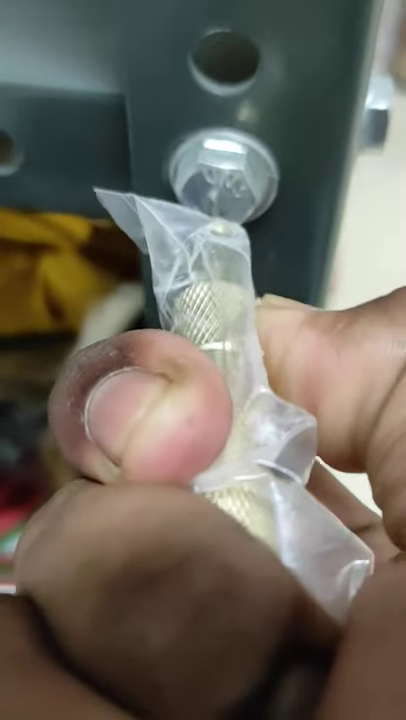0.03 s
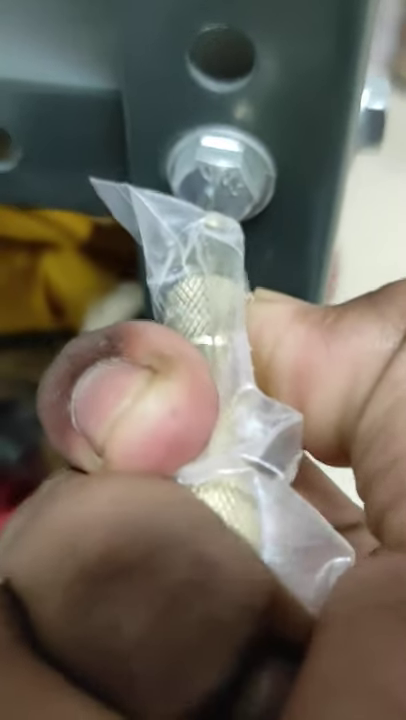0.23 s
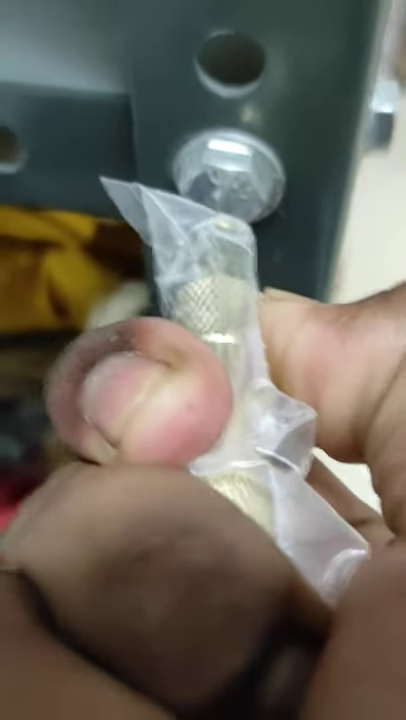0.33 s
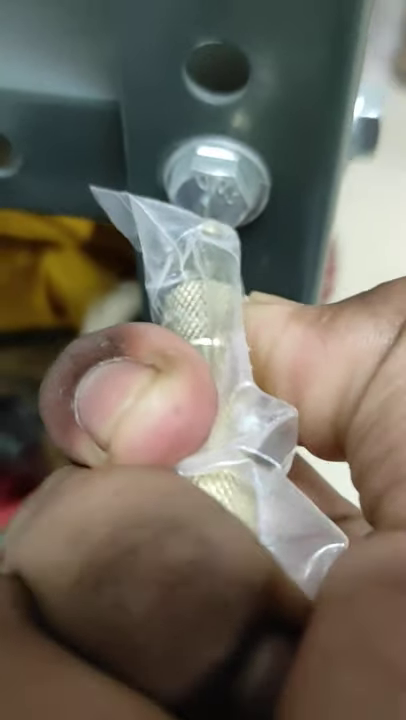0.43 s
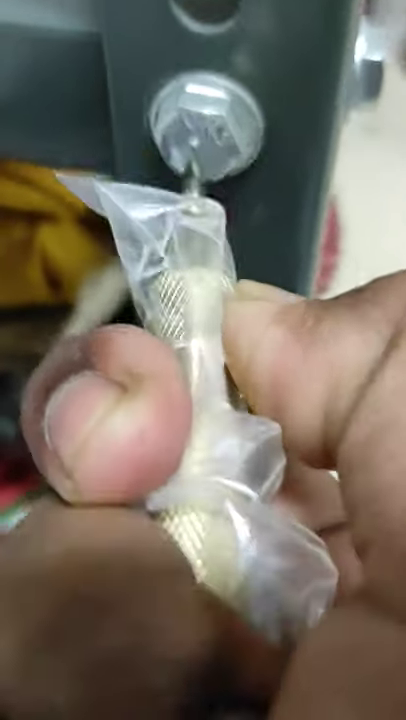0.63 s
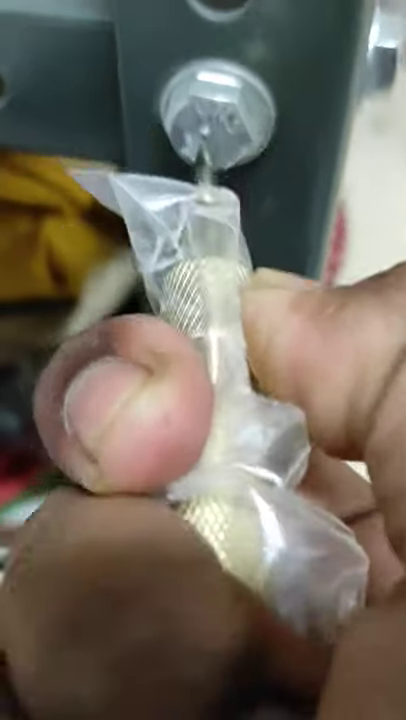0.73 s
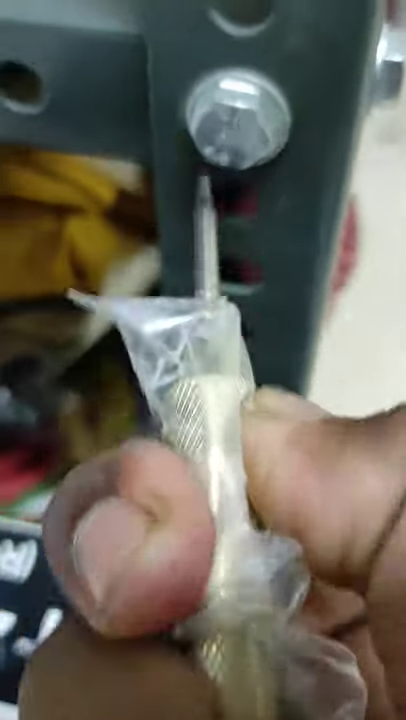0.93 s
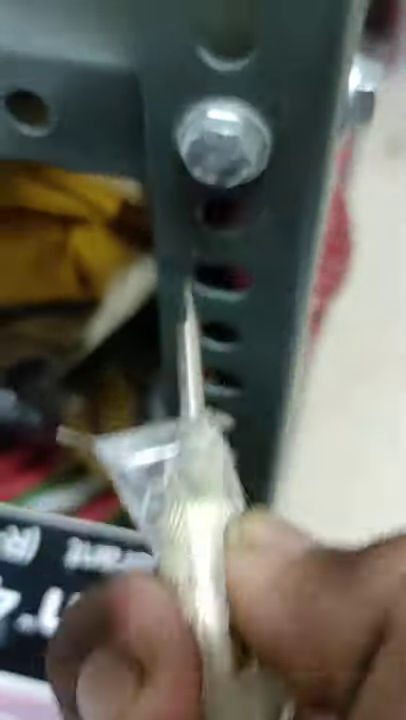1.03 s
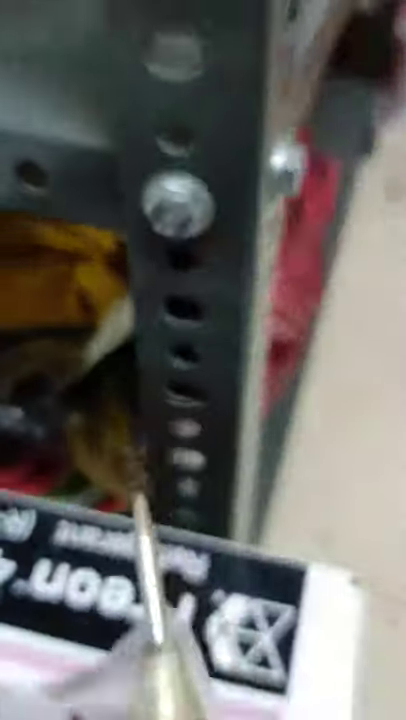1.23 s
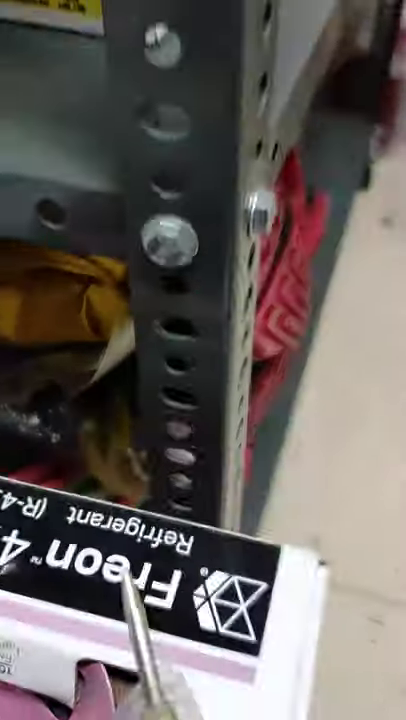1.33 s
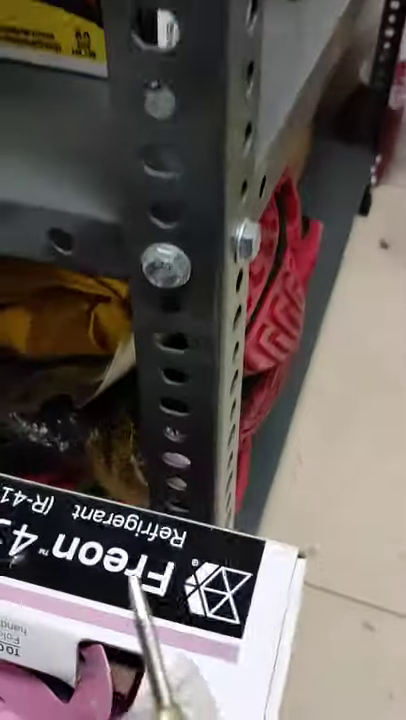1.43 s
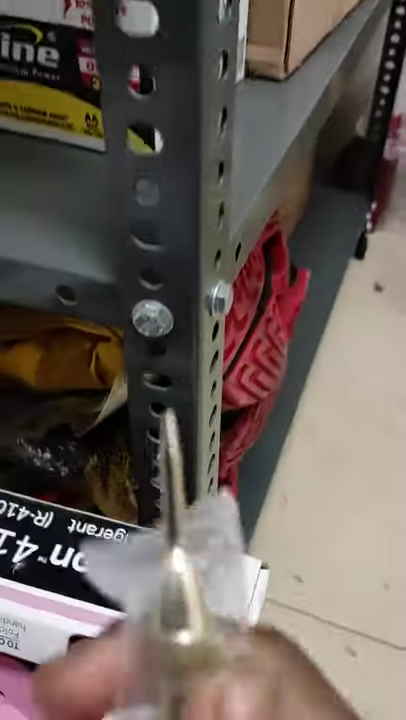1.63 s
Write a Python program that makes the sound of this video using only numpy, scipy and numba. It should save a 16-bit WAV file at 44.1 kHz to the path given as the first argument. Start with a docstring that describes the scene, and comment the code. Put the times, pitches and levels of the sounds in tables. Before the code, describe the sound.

A spring-loaded punch snaps against a steel shelf bolt, ringing briefly, then clicks softly.

```python
"""Centre punch on a steel shelf

A spring-loaded centre punch fires against a bolt in a steel shelf, whose many modes ring densely.
The blow overloads two close microphones, and their gain control dips and recovers. Eased off, the
punch scrapes and resets with clicks; the plastic bag round it rustles and cracks. A quiet room hums."""
import sys
import numpy as np
from scipy import signal
from scipy.fft import rfft, irfft
from scipy.io import wavfile
from scipy.ndimage import uniform_filter1d
from numba import njit

SR = 44100
rng = np.random.default_rng(int(sys.argv[2]) if len(sys.argv) > 2 else 0)


def bounce(signal):
    """Save signal as a 16-bit WAV file at the path given by the first command-line argument."""
    frames = np.transpose(np.atleast_2d(signal))
    limited = np.clip(frames, -1, 1)
    pcm = np.round(limited * 32767).astype(np.int16)
    wavfile.write(sys.argv[1], SR, pcm)


N = 74970
TIME_S = np.arange(N) / SR
SNAP_S, LEFT_DELAY_S = 0.2047, 0.0013

# Clicks of the resetting punch: start_s, drive_db, centre_hz, t60_s, pan_db, shelf_db, body_db
RESET_CLICKS = [(0.6902, -17, 7000, .012, -15, -45, -26), (.6912, -9, 2500, 0.026, -2, -62, -20.5),
                (.6925, -8.5, 8200, 0.026, 8.5, -29.5, -15.5), (.6952, -15.5, 7200, 0.032, -6, -58, -19),
                (0.9171, -23, 6100, 0.016, -4, -46.5, -44), (0.9177, -24.5, 2980, 0.016, -1, -65, -44),
                (0.9229, -27, 5600, .015, 0, -49, -46)]


def shelf_ring():
    """Linear superposition: the blow and each light knock of the reset excite the same steel modes."""
    blow, knocks = np.zeros((2, 2, N))
    blow[0, int((SNAP_S + LEFT_DELAY_S) * SR)] = blow[1, int(SNAP_S * SR)] = undb(-5.5)
    for start_s, *_, shelf_db, _ in RESET_CLICKS:
        knocks[:, int(start_s * SR)] = undb(shelf_db)
    # Light knocks hardly reach the highest modes.
    knocks = signal.sosfilt(signal.butter(4, 10200, fs=SR, output="sos"), knocks)
    return convolve(blow + knocks, steel_response())


def steel_response(size=32768, clatter_t60_s=0.19, rise_s=0.0054, scatter_db=6):
    """Modal overlap: crowded modes of struck steel merge into decaying noise, and a few stand clear."""
    # Resolved modes of shelf and punch: pitch_hz, relative_db, t60_s
    clear_modes = [(200.4, -22, 0.64), (411, -22.5, .5), (579, -8.5, .1), (863, -11, 0.17),
                   (1047.5, -12.5, 0.46), (1470, -19.5, 0.28), (1630, -20, .3), (1963, -11, 0.21),
                   (2200, -11, 0.24), (2430, -22.5, .6), (2616, -18, 0.17), (2880, -14, .2),
                   (3320, -25.5, 0.58), (3556, -25, .45), (3790, -27, 0.46), (4240, -15, 0.45),
                   (4750, -24, 0.73), (5270, -32, 0.62), (5980, -9, 0.18), (6550, -20.5, 0.6),
                   (7000, -25, .7), (6990, -25, .7), (7200, -24, 0.58), (7260, -17, 0.41), (7560, -24, .6),
                   (7700, -23, 0.65), (10000, -22, .45), (10600, -12, 0.45), (10940, -12, .35),
                   (11800, -15, .33), (12100, -8, 0.49), (12570, -9, 0.39), (12760, -12, 0.42),
                   (13610, -17, 0.45), (13850, -17, 0.41), (14110, -16, 0.38), (14980, -18, .25),
                   (15070, -20, .25)]
    # Overlapping modes of the shelf: centre_hz, clatter_db, ring_db, ring_t60_s
    dense_modes = [(60.4, -30, -41, 0.22), (151, -20.5, -54, 0.34), (220, -18.5, -50, 0.9),
                   (425, -15.5, -37, 1), (630, -11, -38, 0.53), (912, -8.5, -19, 0.72),
                   (2080, -11.5, -12, 0.54), (2770, -4.5, -21, 0.83), (3700, -18, -21, 0.65),
                   (4800, -25, -15.5, 0.81), (5930, -25, -14, 0.76), (7430, -13, -6.5, 0.63),
                   (9350, 5, -10.5, 0.48), (12100, -38, -12, 0.72), (16700, -7, -11, 0.2)]
    t = np.arange(size) / SR
    out = modes(clear_modes, size) * undb(1)
    strength = undb(scatter_db * rng.standard_normal(size // 2 + 1))
    spectrum = rfft(rng.standard_normal((2, size))) * strength
    for hz, noise in half_octaves(spectrum, size):
        clatter_db, ring_db, ring_t60_s = columns_at(dense_modes, hz)
        clatter = undb(clatter_db - 60 * t / clatter_t60_s)
        ring = undb(ring_db - 60 * t / ring_t60_s)
        out += unit(noise) * np.hypot(clatter, ring)
    return out * (1 - np.exp(-t / rise_s))


def punch_snap():
    """Path difference: the crack of the firing punch reaches the left microphone later."""
    crack = click(SNAP_S, drive_db=-8.5, centre_hz=5500, t60_s=0.02, pan_db=0)
    crack[0] = np.roll(crack[0], int(LEFT_DELAY_S * SR))
    return crack


def punch_scrape(start_s=0.645, squeak_s=0.672, end_s=0.69, fade_s=0.011):
    """Sliding friction: broadband grit, joined by a narrow squeak just before the reset."""
    def fade_in(onset_s):
        return np.clip((TIME_S - onset_s) / fade_s, 0, 1)

    friction = rng.standard_normal((2, N))
    grit = unit(band(band(friction, 6100, 10100), 6100, 10100)) * undb(-37) * fade_in(start_s)
    squeak = unit(band(friction, hz=7010, width_hz=256.6)) * undb(-41) * fade_in(squeak_s)
    return (grit + squeak) * (TIME_S < end_s) * pan(-6)[:, None]


def body_knocks():
    """Impulse response: each reset click sets the hollow tool body ringing."""
    # Modes of the tool body: pitch_hz, relative_db, t60_s
    body_modes = [(637, -26, 0.052), (720, -20, 0.12), (875, -21, 0.13), (957, -16, 0.12),
                  (1120, -20, 0.17), (2195, -21, 0.038), (3150, -19.5, 0.21), (5050, -22, 0.9),
                  (5728, -29, .4), (6869, -22, .1), (7900, -27, .27), (8660, -31, .3), (9200, -12.5, 0.077)]
    taps = np.zeros((2, N))
    for start_s, *_, body_db in RESET_CLICKS:
        taps[:, int(start_s * SR)] = undb(body_db)
    return convolve(taps, modes(body_modes, SR // 2))


def plastic_bag():
    """Amplitude modulation: noise flickers into a crackle that follows the hand, with louder cracks."""
    # Envelope of the rustle: time_s, level_db, pan_db
    rustle_path = [(.6, -77, 4), (0.759, -76, 5), (.86, -54.5, -4), (.92, -42, -7), (.98, -51, -1),
                   (1.02, -74, 10), (1.2, -65, 4), (1.36, -63, 7), (1.45, -60, 5.5), (1.55, -56, 6),
                   (1.62, -48.5, 6), (1.7, -58, 3)]
    # Single cracks of the plastic: start_s, drive_db, centre_hz, t60_s, pan_db
    cracks = [(1.441, -44, 10100, 0.04, 15), (1.457, -26, 1400, 0.011, 6), (1.483, -40, 8500, .03, 4),
              (1.4856, -32, 8700, 0.012, 12), (1.497, -46, 12000, 0.024, 16), (1.5, -32, 13000, 0.014, 16),
              (1.502, -32, 9500, 0.013, 14), (1.5287, -16, 7600, 0.02, 4), (1.5288, -18.5, 3560, 0.015, 7),
              (1.576, -26.5, 8300, 0.013, 8), (1.577, -27.5, 5070, 0.014, 1),
              (1.606, -34, 2500, 0.016, -11), (1.6819, -18.5, 1400, 0.0096, 10),
              (1.6817, -22.5, 3140, 0.0076, 5), (1.6822, -31.5, 8000, .008, 7)]
    time_s, level_db, pan_db = np.array(rustle_path).T
    grains = rng.standard_normal((2, N)) * undb(3.5 * flutter(340) + 2 * flutter(38.54))
    rustle = unit(band(grains, hz=7000, width_hz=10100)) * undb(np.interp(TIME_S, time_s, level_db))
    return rustle * pan(np.interp(TIME_S, time_s, pan_db)) + sum(click(*row) for row in cracks)


def faint_ring(start_s=0.8, pitch_hz=797.5, growth_s=0.3):
    """Damping overtakes growth: a soft tone swells and dies as the tool is drawn back."""
    t = np.maximum(TIME_S - start_s, 0)
    swell = 1 - np.exp(t / growth_s)
    decay = undb(-43.5 - 120 * t)
    return swell * decay * np.sin(2 * np.pi * pitch_hz * t)


def room_reverb(sound, level_db=-13, t60_s=0.17, cutoff_hz=6500):
    """Diffuse reflection: a dull tail of noise sets in after 3 ms and decays exponentially."""
    t = np.arange(SR // 2) / SR
    tail = rng.standard_normal((2, len(t))) * undb(-60 * t / t60_s) * (t > 0.003)
    tail = signal.lfilter(*signal.butter(1, cutoff_hz, fs=SR), tail)
    return undb(level_db) * convolve(sound, tail / np.sqrt(np.sum(tail ** 2) / 2))


def room_hum(noise_db=-43.5):
    """Partial coherence: flickering noise, partly shared by the channels, and two wavering tones."""
    # Spectrum of the room noise: frequency_hz, relative_density_db, correlation, pan_db
    noise_shape = [(25.4, 0, 0.22, 1.5), (55.6, -2, 1, 7), (110, -12.5, 1, 5.5), (330, -12, 0.81, 9.5),
                   (665, -13, 0.7, 3.5), (1180, -11, -0.28, 5), (2700, -27.5, 0.12, 0),
                   (4300, -39, -0.49, -5), (8300, -36, 0.52, 5), (10100, -48, 0, 13), (15000, -72, 0, 2)]
    # Tones of the hum: pitch_hz, rms_db
    hum_tones = [(62, -56.5), (301, -57)]
    hz = np.maximum(np.fft.rfftfreq(N, 1 / SR), 1)
    density_db, correlation, pan_db = columns_at(noise_shape, hz)
    mid, side = rfft(rng.standard_normal((2, N))) * np.sqrt([1 + correlation, 1 - correlation])
    spectrum = np.array([mid + side, mid - side]) * undb(density_db) * pan(pan_db) * (hz > 14)
    noise = sum(part * undb(-0.5 * flutter(10.4)) for _, part in half_octaves(spectrum, N))
    out = unit(noise) * undb(noise_db)
    for pitch_hz, rms_db in hum_tones:
        amplitude = np.sqrt(2) * undb(rms_db + 2 * flutter(5.04))
        wavering_hz = pitch_hz * (1 + 0.0093 * flutter(8.57))
        out += amplitude * np.sin(2 * np.pi * np.cumsum(wavering_hz) / SR)
    return out


def click(start_s, drive_db, centre_hz, t60_s, pan_db):
    """Transient excitation: a sharp tick and a decaying noise burst drive a broad resonance."""
    t = np.arange(SR // 20) / SR
    drive = rng.standard_normal((2, len(t)))
    drive[:, 0] = undb(12.5)  # the tick stands above the burst
    drive *= undb(drive_db - 60 * t / t60_s)
    width_hz = 0.65 * centre_hz
    burst = band(band(drive, centre_hz, width_hz), centre_hz, width_hz)
    out, start = np.zeros((2, N + SR)), int(start_s * SR)
    out[:, start:start + len(t)] = burst * pan(pan_db)[:, None]
    return out[:, :N]


def modes(table, size):
    """Free vibration: damped sines, each with its own phase at each microphone."""
    hz, db, t60_s = np.array(table, float).T[:, :, None]
    t = np.arange(size) / SR
    phase = rng.random((len(table), 2)).T[:, :, None]
    return np.sum(undb(db - 60 * t / t60_s) * np.sin(2 * np.pi * (hz * t + phase)), axis=1)


def half_octaves(spectrum, size):
    """Overlapping half-octave bands of a spectrum, as (centre_hz, sound) pairs."""
    octave = np.log2(np.maximum(np.fft.rfftfreq(size, 1 / SR), 14) / 20)
    return [(20 * 2 ** (k / 2), irfft(spectrum * np.clip(1 - abs(2 * octave - k), 0, 1), size))
            for k in range(21)]


def columns_at(table, hz):
    """A table's other columns, interpolated over the log of its frequency column."""
    table_hz, *columns = np.array(table, float).T
    return [np.interp(np.log(hz), np.log(table_hz), column) for column in columns]


def flutter(rate_hz):
    """Random values joined by straight ramps."""
    step = int(SR / rate_hz)
    return uniform_filter1d(np.repeat(rng.standard_normal(N // step + 1), step), step)[:N]


def band(x, hz, width_hz):
    """Second-order resonance with unit gain at its centre."""
    return signal.lfilter(*signal.iirpeak(hz, hz / width_hz, SR), x)


def pan(db):
    """Channel gains for a level difference, left minus right."""
    return undb(np.array([db, -db]) / 2)


def undb(db):
    return 10 ** (np.asarray(db, float) / 20)


def unit(x):
    return x / np.sqrt(np.mean(x ** 2))


def convolve(x, response):
    return signal.fftconvolve(x, response, axes=-1)[..., :N]


def port_colour(sound, dull_hz=8890, dull_db=-12.5):
    """Acoustic resonance: each microphone port lifts one band and is less sensitive in the top treble."""
    # Resonances of the left and right port: centre_hz, width_hz, lift_db
    ports = [(8450, 1260, 7.5), (7020, 1150, 7.5)]
    lifted = np.array([channel + (undb(lift_db) - 1) * band(channel, hz, width_hz)
                       for channel, (hz, width_hz, lift_db) in zip(sound, ports)])
    low = signal.sosfiltfilt(signal.butter(4, dull_hz, fs=SR, output="sos"), lifted)
    return low + undb(dull_db) * (lifted - low)


def overload_sag(onset_s=0.0095, dip_s=0.091, back_s=0.19):
    """Overload recovery: after the snap the microphones' baseline sags, then swings back."""
    t = np.maximum(TIME_S - SNAP_S, 0)
    swing = 0.55 * np.exp(-(t / back_s) ** 2) - np.exp(-t / dip_s)
    return undb([[0], [-7.5]]) * swing * (1 - np.exp(-t / onset_s))  # weaker on the right


def gain_control(sound, threshold_db=-24, ratio=2.06, sense_s=0.0029):
    """Compression: the gain falls as the smoothed power passes a threshold."""
    smoothing = signal.butter(1, 1 / (2 * np.pi * sense_s), fs=SR)
    power = signal.lfilter(*smoothing, (sound ** 2).mean(axis=0))
    excess_db = np.maximum(10 * np.log10(power + 1e-12) - threshold_db, 0)
    return undb(-follow(excess_db * (1 - 1 / ratio), attack_s=0.012, release_s=0.033))


@njit
def follow(x, attack_s, release_s):
    """First-order lag with separate time constants for rise and fall."""
    out, level = np.empty(len(x)), 0.
    for i in range(len(x)):
        level += (x[i] - level) / (SR * (attack_s if x[i] > level else release_s))
        out[i] = level
    return out


def scene():
    """Superposition: tool and bag with their reverberation, the ringing shelf and the hum."""
    tool = punch_snap() + sum(click(*row) for *row, _, _ in RESET_CLICKS)
    tool += punch_scrape() + body_knocks()
    shelf = shelf_ring()
    direct = tool + plastic_bag() + faint_ring()
    return direct + room_reverb(direct) + shelf + room_hum()


def record(dry, ceiling=0.66, cutoff_hz=16400):
    """Transduction: port resonance, overload sag, gain control, soft clipping and a steep low-pass."""
    coloured = port_colour(dry)
    compressed = (coloured + overload_sag()) * gain_control(coloured)
    clipped = ceiling * np.tanh(compressed / ceiling)
    return signal.sosfilt(signal.ellip(10, 0.2, 80, cutoff_hz, fs=SR, output="sos"), clipped)


dry = scene()
out = record(dry)
bounce(out)
```